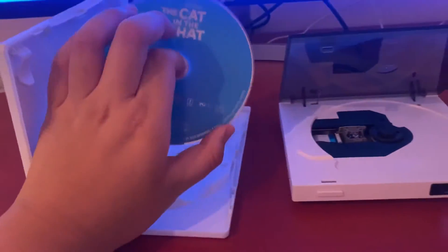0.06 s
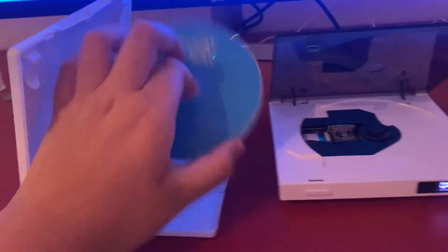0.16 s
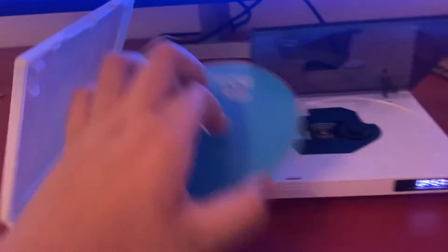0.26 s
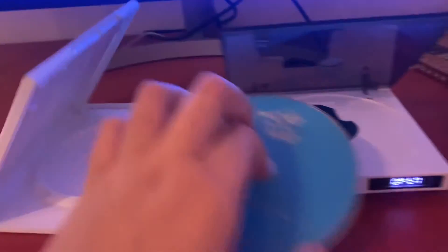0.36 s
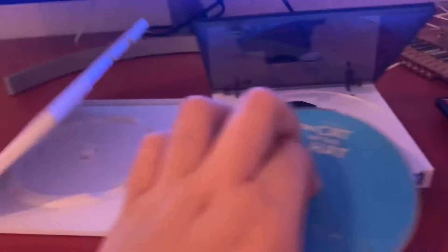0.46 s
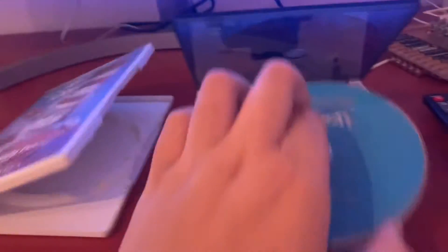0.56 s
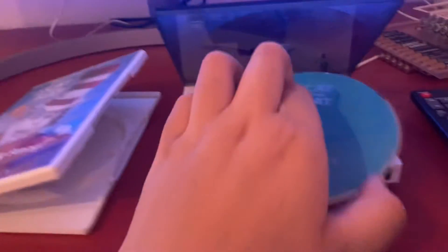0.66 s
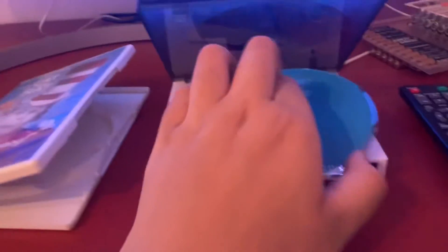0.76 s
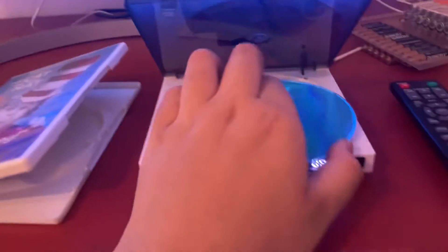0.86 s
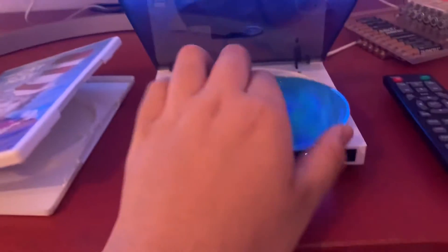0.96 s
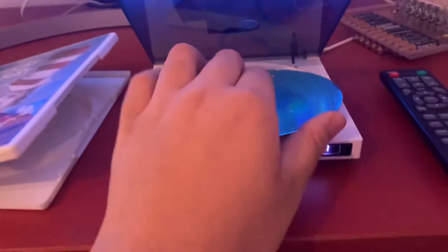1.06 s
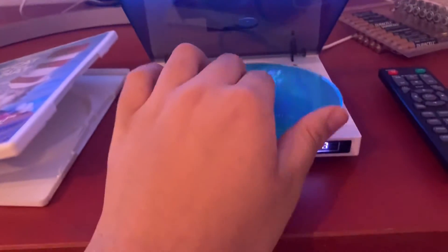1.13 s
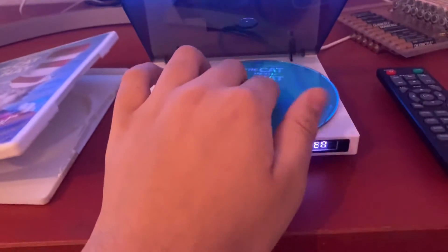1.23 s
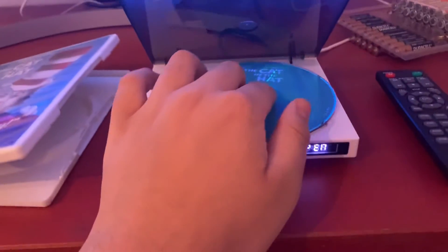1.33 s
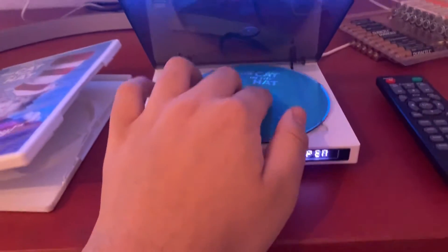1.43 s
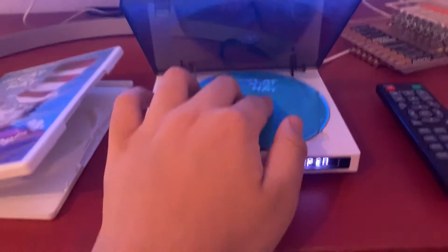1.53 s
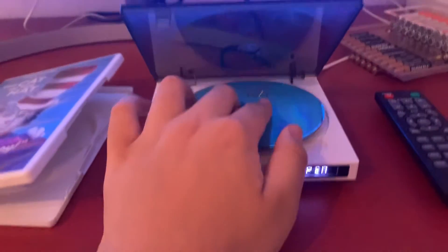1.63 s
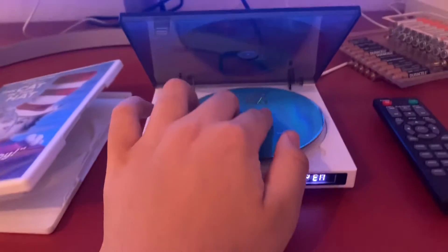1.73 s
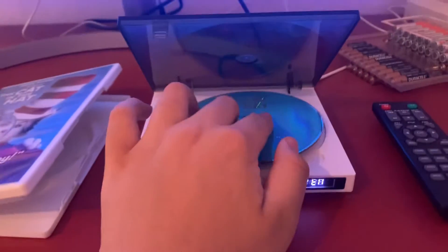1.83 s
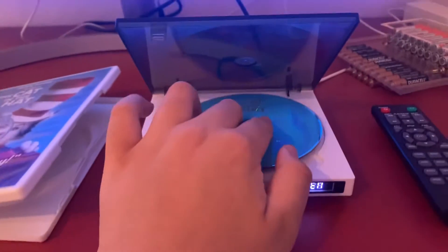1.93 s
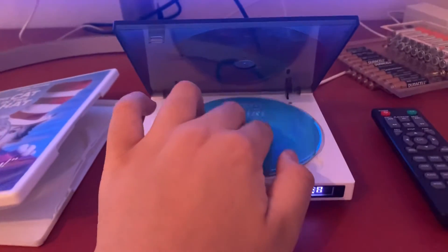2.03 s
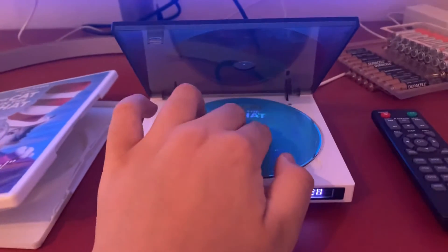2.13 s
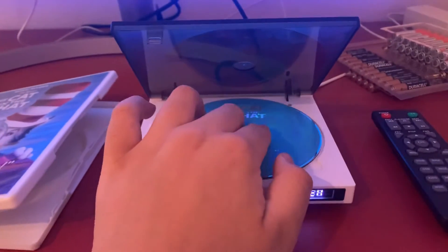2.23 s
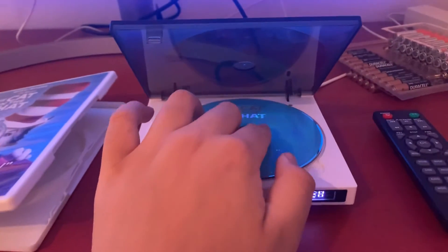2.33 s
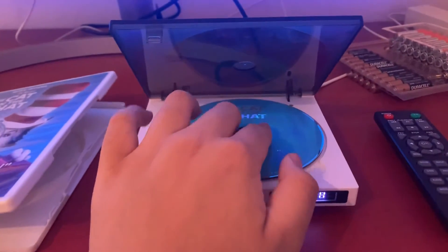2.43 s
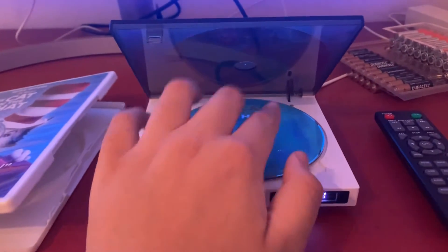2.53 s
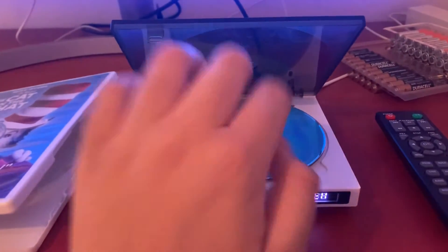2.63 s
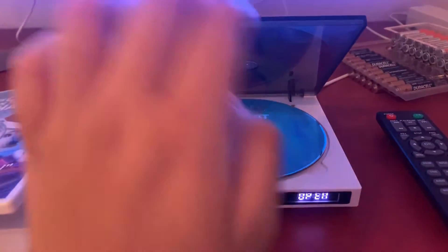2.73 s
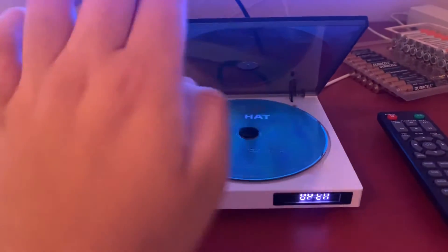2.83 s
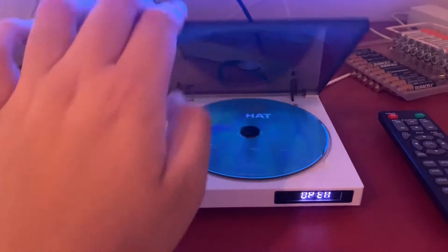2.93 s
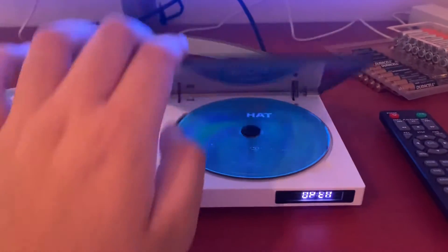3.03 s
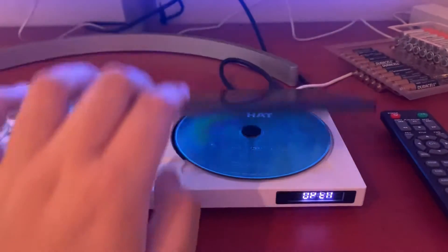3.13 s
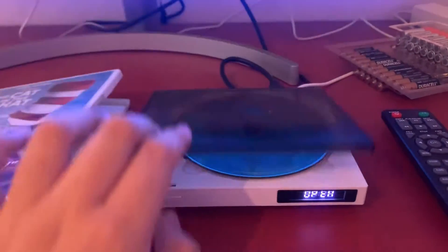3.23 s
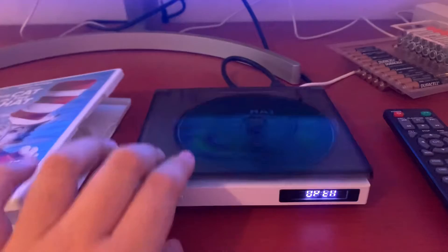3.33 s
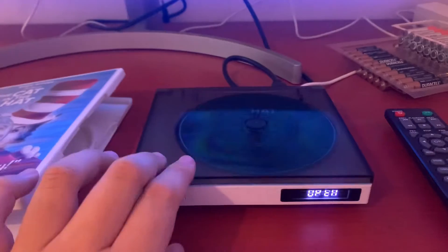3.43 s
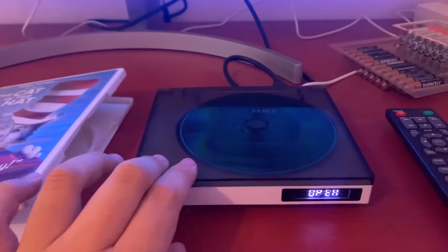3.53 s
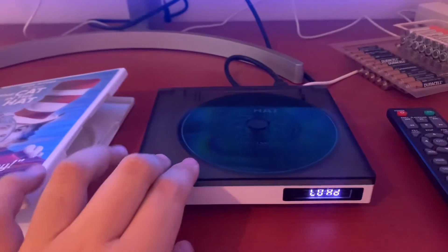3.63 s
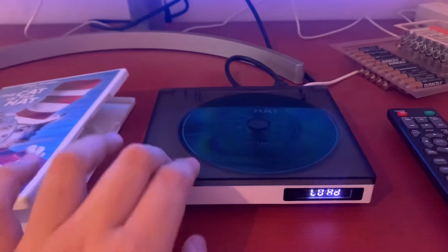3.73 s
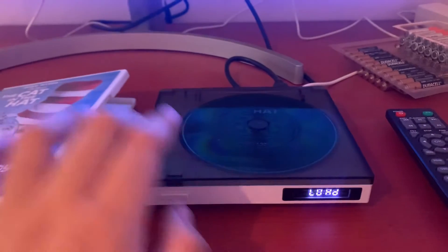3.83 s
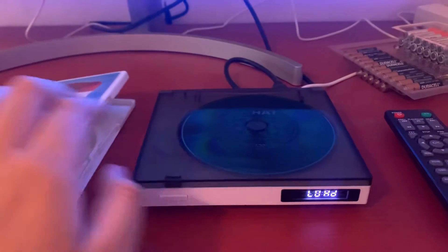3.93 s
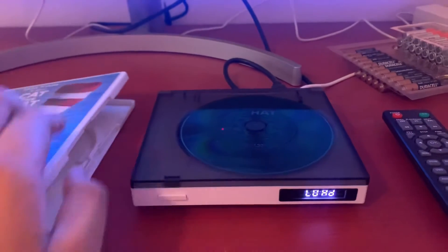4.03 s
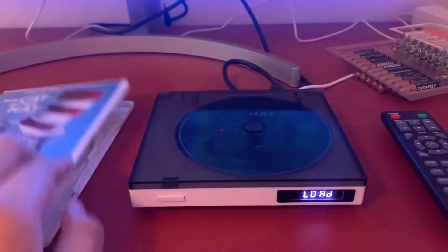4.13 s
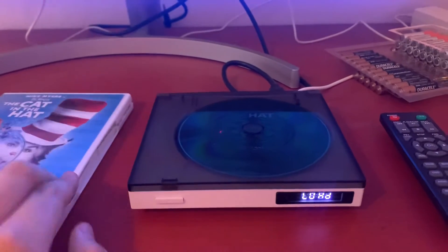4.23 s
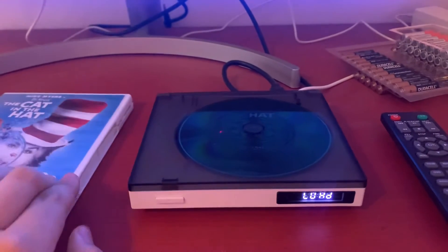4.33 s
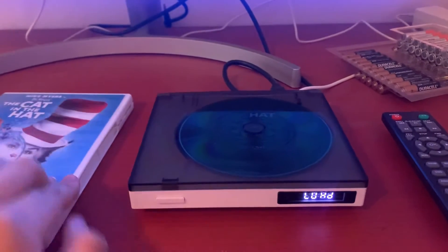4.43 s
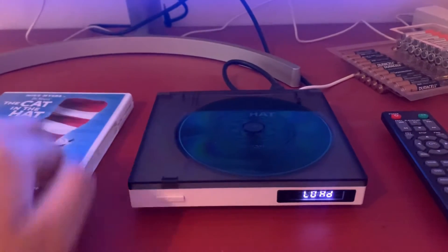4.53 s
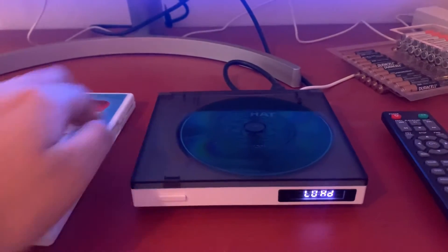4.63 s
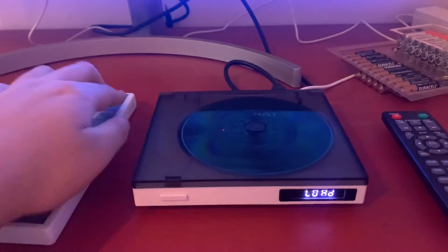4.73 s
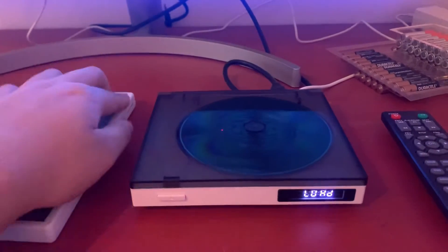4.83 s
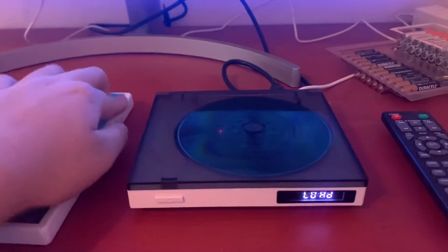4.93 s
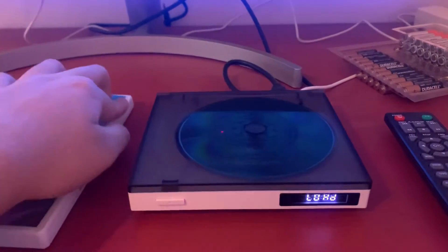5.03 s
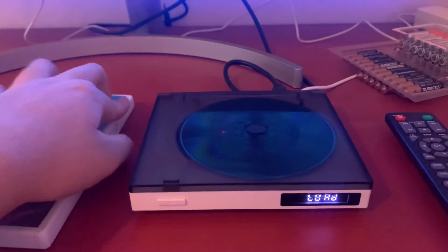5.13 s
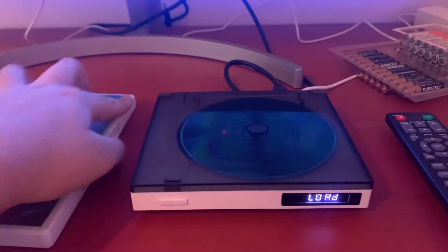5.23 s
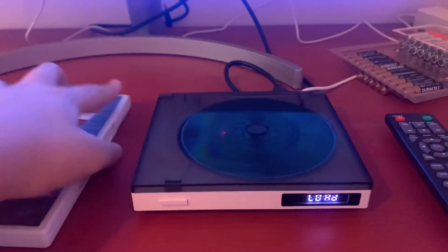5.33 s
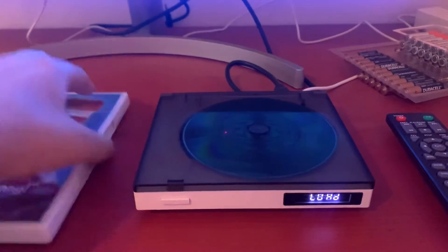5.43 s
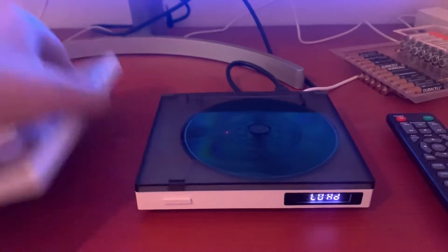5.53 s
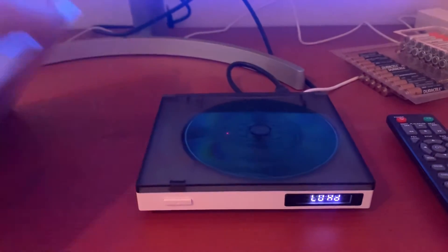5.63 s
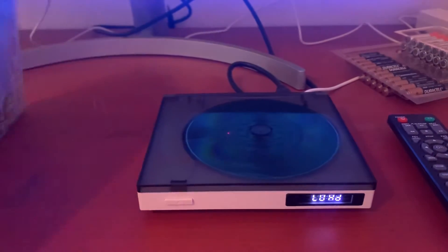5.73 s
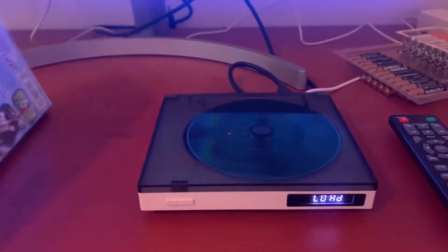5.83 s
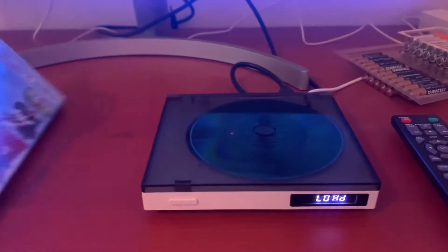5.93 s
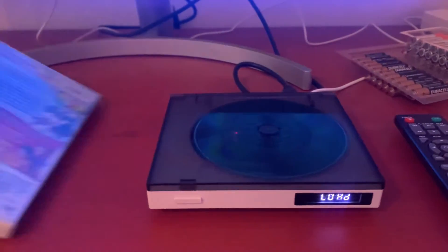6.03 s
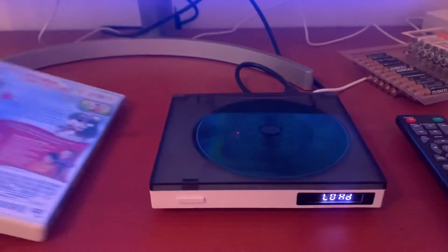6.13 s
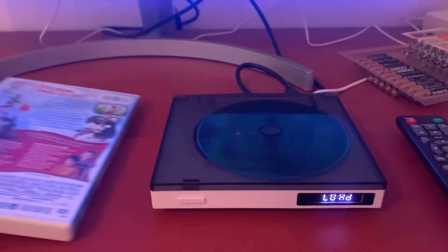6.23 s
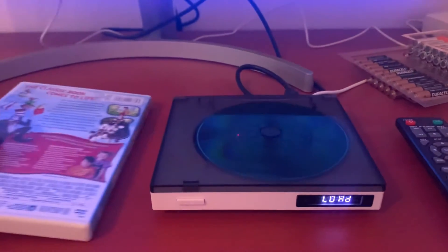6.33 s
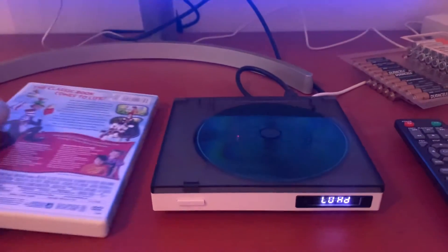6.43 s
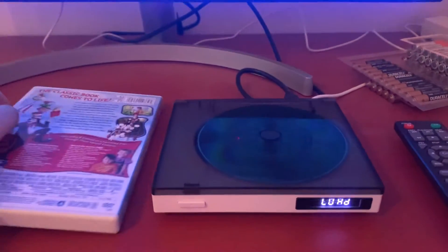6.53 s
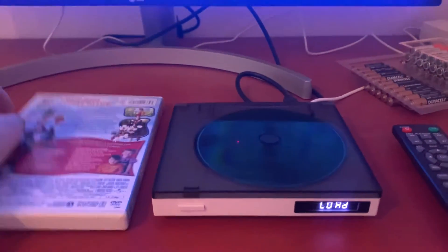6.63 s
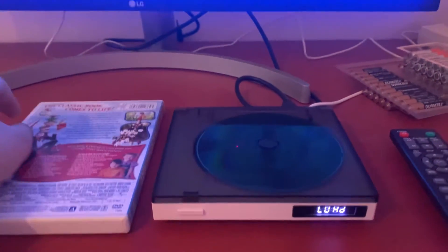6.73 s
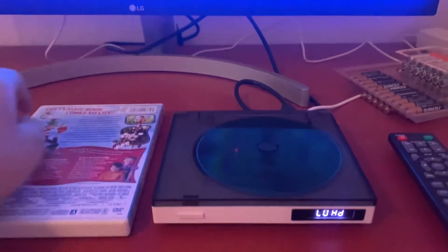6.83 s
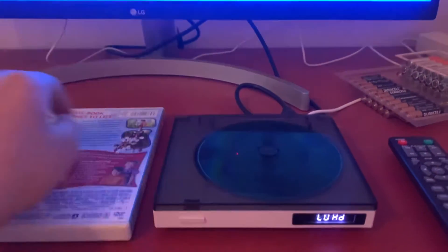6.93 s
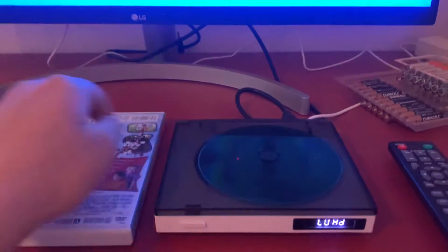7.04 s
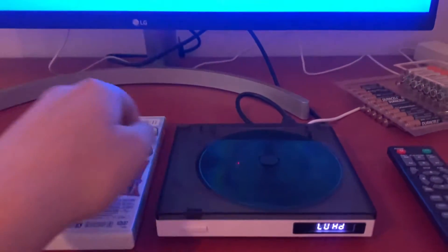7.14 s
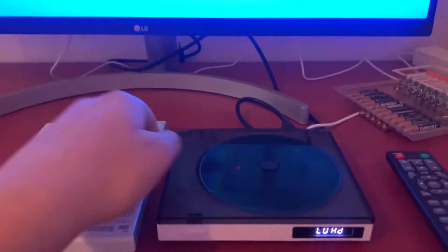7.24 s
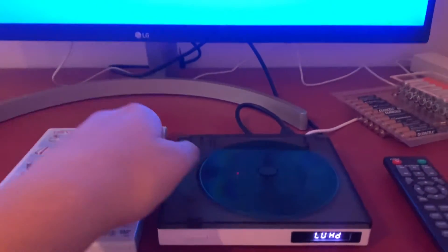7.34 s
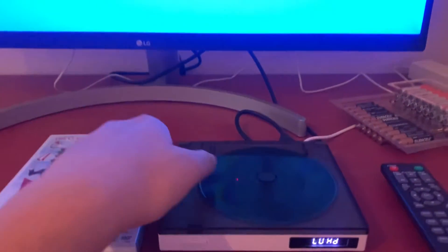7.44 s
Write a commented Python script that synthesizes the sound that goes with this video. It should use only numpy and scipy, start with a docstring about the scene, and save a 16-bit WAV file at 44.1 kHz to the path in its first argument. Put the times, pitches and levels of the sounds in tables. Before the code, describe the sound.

Close hard-plastic clicks: a disc clacks onto a small player, snaps home, lid latches, case snaps shut and knocks the desk over faint drive hum.

```python
"""In a small room, at a desk, a disc is lifted from its plastic case, laid in a small player and pressed onto the hub.
The lid is shut and latches; the case is snapped closed, pressed against the desk and laid down.
Each contact is a few ms of noise ringing resonances, with a low thud; fingers and plastic rub as swelling noise.
The drive is wavering sines and resonant noise; a faint room rush and a steady hiss lie underneath.
Two microphone ports listen from close by."""
import sys
import numpy as np
from scipy import signal
from scipy.fft import rfft, irfft, next_fast_len
from scipy.io import wavfile
from scipy.ndimage import uniform_filter1d, map_coordinates

SR = 44100
rng = np.random.default_rng(int(sys.argv[2]) if len(sys.argv) > 2 else 0)


def wrap_up_sound(samples):
    """Save the sound to the file named by the first command line argument, as 16-bit audio."""
    columns = np.atleast_2d(samples).T
    # keep every value between -1 and 1, then stretch to whole-number steps
    tamed = np.clip(columns, -1, 1)
    steps = np.round(tamed * 32767).astype(np.int16)
    wavfile.write(sys.argv[1], SR, steps)


N = 329427  # length in samples


def amp(db):
    """Decibels to gain."""
    return 10 ** (np.asarray(db) / 20)


def unit(x):
    """Scale to rms 1."""
    return x / np.sqrt(np.mean(x ** 2) + 1e-20)


def blow(x):
    """Scale each channel to the energy of 10 ms at rms 1."""
    return x / np.linalg.norm(x, axis=-1, keepdims=True) * np.sqrt(SR / 100)


def along(points, hz):
    """Read a curve of (Hz, value) points on a log frequency axis."""
    f, v = np.transpose(points)
    return np.interp(np.log(hz + 1), np.log(f + 1), v)


def wobble(rate):
    """A smooth random curve through `rate` random knots a second."""
    knots = rng.standard_normal(int(N * rate / SR) + 4)
    return map_coordinates(knots, [np.arange(N) * rate / SR])


def curves(rows):
    """Smoothed gain per sample for each dB column after the time column; -120 dB outside the rows."""
    s, *columns = np.transpose(rows)
    t = np.arange(N) / SR
    return [uniform_filter1d(amp(np.interp(t, s, db, -120, -120)), size=900) for db in columns]


def held(start, end, ramp_s):
    """1 from start to end, with a linear ramp centred on each edge."""
    t = np.arange(N) / SR
    return np.clip(np.minimum(t - start, end - t) / ramp_s + .5, 0, 1)


def filtered(x, response):
    """Shape x by a complex response of frequency."""
    n = x.shape[-1]
    m = next_fast_len(n + SR // 4)
    return irfft(rfft(x, m) * response(np.fft.rfftfreq(m, 1 / SR)), m)[..., :n]


def resonate(x, body):
    """Ring a body's (Hz, width Hz, dB) resonances in parallel, with alternating signs."""
    def response(f):
        total = 0
        for k, (hz, width, db) in enumerate(body):
            total = total + (-1) ** k * amp(db) * 1j * f * width / (hz * hz - f * f + 1j * f * width)
        return total
    return filtered(x, response)


def noise(colour):
    """Two unrelated noises, rms 1 overall, with a (Hz, dB) spectrum."""
    return unit(filtered(rng.standard_normal((2, N)), lambda hz: amp(along(colour, hz))))


def ringing(body):
    """Two unrelated noises, rms 1 overall, heard through a set of resonances."""
    return unit(resonate(rng.standard_normal((2, N)), body))


def tone(hz):
    """A sine of rms 1 that follows a pitch curve."""
    return np.sqrt(2) * np.sin(2 * np.pi * (np.cumsum(hz) / SR + rng.random()))


def add(track, s, x):
    """Mix x into the track at time s."""
    part = track[:, round(s * SR):][:, :x.shape[1]]
    part += x[:, :part.shape[1]]


# How long the small room rings. Each row: frequency in Hz, mean decay time (T60) in s.
ROOM_DECAY = [(100, 0.053), (400, 0.34), (1000, 0.32), (4000, 0.31), (10000, 0.22), (16000, 0.075)]


def in_room(x, wet_db):
    """Add a fresh tail that builds up as walls answer in uneven clumps; some bands linger, the treble dies sooner."""
    hz, t, z = signal.stft(rng.standard_normal((2, SR // 2)), SR, nperseg=256)
    build_up = 1 - np.exp(-(t / .006) ** 2)
    t60 = along(ROOM_DECAY, hz) * np.exp(.08 * rng.standard_normal(len(hz)))  # scatter from band to band
    clumps_db = 2 * rng.standard_normal(len(t))
    decay = amp(clumps_db - 60 * t / t60[:, None])
    tail = signal.istft(z * build_up * decay, SR, nperseg=256)[1]
    tail = tail / np.linalg.norm(tail[0])
    return x + amp(wet_db) * signal.fftconvolve(x, tail, axes=1)[:, :x.shape[1]]


# Colour of the microphones' own hiss. Each row: frequency in Hz, relative level in dB.
HISS_COLOUR = [(1000, -3.5), (5000, -7.5), (10000, -12), (16000, -10)]


def microphone_hiss():
    """The microphones' own steady hiss, as shaped noise."""
    return amp(-78.5) * noise(HISS_COLOUR)


# Colour of the room's rush. Each row: frequency in Hz, relative level in dB.
ROOM_RUSH = [(18, -36.5), (30, -16.5), (59, 2), (138, -5.5), (174, -19), (239, -6.5), (287, -24.5),
             (473, -11), (684, -20.5), (913, -8), (1040, -21.5), (1430, -18.5), (4910, -46), (10800, -54.5),
             (16000, -44.5)]


def room_air():
    """The room's faint rush, as shaped noise."""
    return amp(-59.5) * noise(ROOM_RUSH)


# Runs of the lens sled. Each row: start in seconds, end in seconds, level in dB.
SLED_RUNS = [(4.636, 4.959, -73.5), (7.188, 7.5, -67)]
# Lines of its gear buzz. Each row: pitch at the start of a run in Hz, relative level in dB.
GEAR_LINES = [(415, -3.5), (800, -3), (1170, -9), (1570, -12), (2070, -6), (2430, -8), (2720, -10.5),
              (2940, -10.5), (4230, -11), (5010, -12.5), (5520, -12)]


def sled():
    """The lens sled's gears buzz as shivering sines that rise a little in pitch along each run."""
    t, out = np.arange(N) / SR, np.zeros(N)
    for start, end, db in SLED_RUNS:
        rise = 1 + .1 * (t - start)  # share of speed gained each second
        speed = rise * (1 + .012 * wobble(250))
        buzz = sum(amp(level) * tone(hz * speed) for hz, level in GEAR_LINES)
        out += amp(db + 3 * wobble(41)) * held(start, end, ramp_s=.04) * buzz
    return out


# The drive spins up, eases off and starts again.
# Each row: time in seconds, then levels in dB for shake, hum, whirr (before a 0.5 dB lift) and whine.
DRIVE_LEVELS = [(3.7, -80.5, -76.5, -100, -110), (4.6, -57, -57, -79.5, -87),
                (5.15, -55.5, -51.5, -62.5, -75), (5.8, -56.5, -53.5, -66.5, -72),
                (6.15, -52, -46.5, -58, -64.5), (6.5, -63, -64.5, -71, -69.5),
                (7.22, -54, -58.5, -63, -70.5), (7.47, -50.5, -55, -59, -75)]
# The disc's speed. Each row: time in seconds, speed as a share of full speed.
DISC_SPEED = [(3.7, .8), (4.6, 0.93), (5.102, 1), (5.601, 1), (5.85, 0.91), (6.101, 1), (6.5, 0.89),
              (6.85, 0.88), (7.47, 0.99)]
# Hum through the desk. Each row: pitch at full speed in Hz, relative level in dB.
HUM_LINES = [(97, -4.5), (138, -16.5), (170, -18.5), (195, -22.5)]
# Whirr in the shell. Each row: resonance in Hz, width in Hz, relative level in dB.
WHIRR_BODY = [(475, 240, 4.5), (910, 42, 2), (1200, 33, -5), (2085, 2500, -13), (2500, 280, -6.5),
              (3570, 510, -5.5), (4260, 800, -8), (4860, 160, -9), (5440, 110, -9), (6800, 320, -20)]
# The spindle's whine. Each row: mean pitch in Hz, relative level in dB.
WHINE_LINES = [(3580, -1), (4480, -16), (5630, -10), (6520, -19)]
SHAKE_HZ = 58  # the disc's imbalance, once a turn at full speed
WANDER_PER_S = 10  # knots a second in the slow wander of hum and whine


def drive():
    """The spinning disc shakes and hums through the desk; the spindle holds a thin whine and whirrs in the shell."""
    shake, hum, whirr, whine = curves(DRIVE_LEVELS)
    speed = np.interp(np.arange(N) / SR, *np.transpose(DISC_SPEED))

    def turning_line(full_speed_hz):
        flutter = amp(3 * wobble(7.5))
        return flutter * tone(full_speed_hz * (speed + .01 * wobble(WANDER_PER_S)))

    low = shake * unit(turning_line(SHAKE_HZ))
    low += hum * unit(sum(amp(db) * turning_line(hz) for hz, db in HUM_LINES))
    shivering = 1 + .016 * wobble(400) + .005 * wobble(WANDER_PER_S)  # fast shiver, slow drift
    thin = sum(amp(db + 3.8 * wobble(30)) * tone(hz * shivering) for hz, db in WHINE_LINES)
    return low + amp(0.5) * whirr * ringing(WHIRR_BODY) + whine * thin + sled()


# The background sinks briefly. Each row: start in seconds, end in seconds, depth in dB.
QUIET_SPELLS = [(0.425, 0.905, 6.5), (1.772, 2.014, 10.5), (2.598, 2.715, 15.5), (2.769, 3.052, 11.5),
                (4.75, 4.798, 22.5), (6.688, 7.146, 10.5)]


def background():
    """The room's rush and the drive sink together in the lulls, over the steady hiss."""
    sink_db = sum(depth_db * held(start, end, ramp_s=.076) for start, end, depth_db in QUIET_SPELLS)
    return amp(-sink_db) * (room_air() + drive()) + microphone_hiss()


def swells(rows):
    """Gain per sample for each dB column of strokes that swell quickly and fade more slowly."""
    t, peak = np.arange(N) / SR, .13  # the peak comes this far into a stroke

    def hump(s, length):
        return np.sin(np.pi / 2 * np.interp(t, [s, s + peak * length, s + length], [0, 1, 0])) ** 2

    return sum(amp(levels_db)[:, None] * hump(s, length) for s, length, *levels_db in rows)


# Fingers and plastic brush past each other.
# Each row: start in seconds, length in seconds, rub level in dB (before a 3 dB cut), hiss level in dB.
BRUSH_STROKES = [(.5, 0.068, -82, -62), (.76, 0.13, -56.5, -63.5), (1.07, 0.2, -33, -65),
                 (1.36, 0.18, -58.5, -78), (1.572, 0.07, -40, -63), (2.05, 0.25, -48, -68.5),
                 (2.9, 0.088, -61.5, -100), (3.07, 0.28, -74.5, -95), (3.69, 0.13, -56, -77),
                 (4.48, 0.15, -61, -71), (4.77, .08, -63, -71), (5.24, 0.78, -61, -80.5),
                 (5.53, 0.27, -49.5, -66), (5.92, 0.25, -49.5, -57.5), (6.1, 0.35, -61.5, -65.5),
                 (6.36, 0.39, -67.5, -74)]
# Colour of the rub. Each row: frequency in Hz, relative level in dB.
RUB_COLOUR = [(290, -30), (500, -10), (708, -7.5), (873, 0), (1390, -10.5), (2180, -12.5), (6640, -25.5),
              (7640, -29), (8000, -60), (10400, -91.5), (17600, -120)]
# Colour of the brushing hiss. Each row: frequency in Hz, relative level in dB.
BRUSH_HISS = [(7000, -35.5), (10000, -1.5), (12000, -1.5), (13500, -7), (15200, 1), (17000, -20.5)]


def brushing():
    """Broad noise made grainy: plastic slides in tiny catches that bunch together."""
    rub, hiss = swells(BRUSH_STROKES)
    grain = unit(amp(1.5 * wobble(160) + 2.2 * wobble(35)))  # fine catches, slower clumps
    return grain * (amp(-3.0) * rub * noise(RUB_COLOUR) + hiss * noise(BRUSH_HISS))


# Slips that sing: the disc on the tray, fingers on plastic, the case on the desk.
# Each row: start in seconds, length in seconds, pitch in Hz, width in Hz, level in dB.
SINGING_SLIPS = [(1.272, 0.22, 3020, 30.3, -58), (1.724, .2, 4700, 450, -76.5),
                 (1.863, 0.23, 3550, 130, -79), (1.88, .13, 2730, 150, -79), (1.953, .08, 1652, 30, -71),
                 (3.048, 0.16, 1890, 598, -79.5), (3.071, .27, 517, 159, -68.5),
                 (3.722, 0.086, 3420, 119, -68), (4.786, 0.29, 2400, 450, -60),
                 (5.536, 0.18, 2343, 600, -59.5), (5.711, 0.062, 2250, 300, -55),
                 (6.515, .04, 289, 110, -58), (6.565, .04, 317, 119.3, -52), (6.59, .04, 480, 140, -65)]


def squeaks():
    """Each slip is a swell of noise in one narrow resonance, with a grainy level."""
    slips = np.zeros((2, N))
    for s, length, hz, width, db in SINGING_SLIPS:
        swell = np.hanning(round(length * SR))
        band = unit(resonate(rng.standard_normal((2, len(swell))), [(hz, width, 0)]))
        add(slips, s, amp(db) * swell * band)
    return unit(amp(2 * wobble(110))) * slips


def rubbing():
    """Brushing and singing slips share the room's answer."""
    return in_room(brushing() + squeaks(), wet_db=-7.5)


# The player or the case is pushed against the desk. Each row: time in seconds, level in dB.
DESK_PUSHES = [(1.91, -68), (4.942, -26)]
# The hollow answer. Each row: resonance in Hz, width in Hz, relative level in dB.
PUSH_BODY = [(240, 61, -2.5), (330, 220, -4), (460, 120, -14.5)]


def bumps():
    """A soft push, a smooth burst of noise through low resonances, gives a hollow knock with no click."""
    out, t = np.zeros((2, N)), np.arange(SR // 2) / SR
    pulse = t / .0075 * np.exp(-(t / .0075) ** 2)
    for s, db in DESK_PUSHES:
        push = rng.standard_normal((2, len(t))) * pulse
        add(out, s, in_room(amp(db) * blow(resonate(push, PUSH_BODY)), wet_db=-7.5))
    return out


def thud(t, low_modes, rise_s=0.0042):
    """A heavy thing swings up slowly under a blow and rings in decaying low sines."""
    ring = np.zeros(len(t))
    for hz, db, t60 in low_modes:
        decay = amp(db + rng.normal(0, 0.45) - 60 * t / t60)
        ring += decay * np.sin(2 * np.pi * (hz * t + rng.random()))
    return blow(ring * (1 - np.exp(-(t / rise_s) ** 2)))


# The player is leaned on. Each row: time in seconds, level in dB.
LEANS = [(0.937, -30.5), (3.36, -37)]
# It rocks on its feet. Each row: mode in Hz, relative level in dB, T60 in seconds.
LEAN_MODES = [(137, 2.5, 0.19), (146, -4, 0.55)]


def rocking():
    """A lean on the player swells into a low thump with no click."""
    out, t = np.zeros((2, N)), np.arange(SR // 2) / SR
    for s, db in LEANS:
        add(out, s, amp(db) * np.tile(thud(t, LEAN_MODES, rise_s=.016), (2, 1)))
    return out


def chatter(t, length_s):
    """A few ms of edges rattling against each other, with a partly evened-out spectrum."""
    burst = (1 - np.exp(-t / 0.0016)) * np.exp(-(t / length_s) ** 2)
    z = rfft(rng.standard_normal((2, len(t))) * burst)
    even = irfft(z / (np.abs(z) + 1e-9) ** .55, len(t))  # exponent 1 would be fully flat
    return even * np.exp(-(t / (2 * length_s)) ** 4)


# Parts of a blow: hollow, knock, crack, snap, tick. Each row: lower edge in Hz, upper edge in Hz.
BLOW_PARTS = [(220, 600), (600, 1400), (1400, 3200), (3200, 7500), (7500, 15200)]


def balanced(x, levels_db):
    """Bring each part of a blow, from hollow to tick, towards its level and thin out the bass."""
    z, hz = rfft(x), np.fft.rfftfreq(x.shape[1], 1 / SR)
    points = []
    for (lo, hi), db in zip(BLOW_PARTS, levels_db):
        power = np.sum(np.abs(z[:, (hz > lo) & (hz < hi)]) ** 2)
        energy = 2 * power / x.size / (SR / 100)  # against 10 ms at rms 1
        gain_db = db - 10 * np.log10(energy)
        points += [(lo * 1.1, gain_db), (hi / 1.1, gain_db)]
    low_cut = hz ** 4 / (hz ** 4 + 190. ** 4)
    return irfft(z * amp(along(points, hz)) * low_cut, x.shape[1])


def contacts(rows, body, low_modes, parts_db, wet_db, raw_db, spot_db=3.0):
    """Each contact is chatter that rings the plastic, tilted by its brightness, plus a tick and a low thud."""
    out, t = np.zeros((2, N)), np.arange(SR // 2) / SR
    # brightness tilts hollow, knock, crack and snap about 2 kHz
    octaves = np.log2(np.array(BLOW_PARTS[:-1]) / 2000).mean(axis=1)
    for s, strength_db, brightness, tick_db, thud_db, length in rows:
        rattle = chatter(t, length)
        # every spot that is struck favours other resonances
        spot = [(hz, width, db + spot_db * rng.normal()) for hz, width, db in body]
        shell = blow(resonate(rattle, spot)) + amp(raw_db) * blow(rattle)
        levels_db = [*(strength_db + brightness * octaves + parts_db), tick_db]
        click = balanced(shell, levels_db) * (t < .4)
        add(out, s, in_room(click, wet_db) + amp(thud_db) * thud(t, low_modes))
    return out


# Low modes of the desk. Each row: mode in Hz, relative level in dB, T60 in seconds.
DESK_MODES = [(62.6, -11.5, 0.26), (91.5, -7.5, 0.11), (133, 0, 0.085), (139.3, 1.5, 0.16), (186, -8, 0.11),
              (212, -11, 0.069)]
# The rosette lets go. Each row: start in seconds, strength in dB, brightness in dB per octave,
# tick in dB, thud in dB, length in seconds.
RELEASE_HITS = [(.2045, -50, -1, -48.5, -57, 0.0051)]
# The rosette's ring. Each row: resonance in Hz, width in Hz, relative level in dB.
ROSETTE_BODY = [(654, 34, 1), (786, 130, -3), (967, 107, 0.5), (1740, 82, -3), (8600, 1000, -28),
                (14300, 1200, -19)]


def release():
    """The case's rosette lets go of the disc with a small knocking click."""
    return contacts(RELEASE_HITS, ROSETTE_BODY, DESK_MODES, parts_db=[-12.0, 10.5, -0.5, -13],
                    wet_db=-12.5, raw_db=-35)


# The cover's taps. Each row: start in seconds, strength in dB, brightness in dB per octave,
# tick in dB, thud in dB, length in seconds.
FLAP_HITS = [(.508, -51, 1.9, -45, -77, 0.004), (.522, -59, 0.8, -60, -85, 0.0022),
             (.565, -57, 2.5, -53, -81, 0.0019), (.669, -57, 0, -54.5, -63, 0.004),
             (.688, -64.5, -0.18, -63, -71, 0.0033), (.766, -50.5, -1, -49.5, -84, 0.004),
             (.786, -56.5, -2, -68, -76, .003), (.817, -52, -2.15, -59, -72, .003),
             (.826, -51.5, -0.82, -53, -64.5, 0.0023), (.846, -58.5, -1, -61, -78, .003)]
# The cover's ring. Each row: resonance in Hz, width in Hz, relative level in dB.
COVER_RING = [(486, 50, -3.5), (908, 100, -1.5), (1160, 170, -2), (1555, 220, 4), (2080, 410, -1),
              (2920, 660, -5), (4300, 650, -7), (6300, 1600, -10.5), (11160, 3400, -9.5), (14500, 1500, -3)]


def flap():
    """The case's cover swings to and fro in light taps that ring its sheet."""
    return contacts(FLAP_HITS, COVER_RING, DESK_MODES, parts_db=[-12.5, -3.5, 1.5, -1.5],
                    wet_db=-4.0, raw_db=-15.0, spot_db=3.5)


# The disc's landing. Each row: start in seconds, strength in dB, brightness in dB per octave,
# tick in dB, thud in dB, length in seconds.
TRAY_HITS = [(.927, -38.5, -3.5, -59, -49, 0.0044), (.939, -44.5, -1, -52.5, -50, 0.0048),
             (.951, -48.5, -0.5, -60.5, -51.5, 0.0037), (.972, -52, -1, -60, -58, .005),
             (1.001, -48, 3, -53, -56.5, 0.014), (1.096, -20, 4, -16, -35.5, 0.0074),
             (1.139, -38, -0.5, -45, -41.5, 0.019), (1.157, -36.5, -3.96, -35.5, -51, 0.0014),
             (1.18, -35, 5, -26.5, -34, 0.009), (1.207, -38, -1.5, -58.5, -54, 0.0035),
             (1.426, -67, 3, -68, -70.5, 0.0062), (1.462, -57.5, -2, -86, -63, 0.0083),
             (1.522, -62.5, -5.5, -60.5, -53, 0.0023), (1.576, -64, -6, -55, -68, .0015),
             (1.581, -44, 0.5, -41.5, -50.5, 0.0027), (1.587, -45.5, 1, -49, -58, 0.0025),
             (1.595, -44.5, 2.5, -49.5, -52.5, 0.0028), (1.603, -38, -1, -66, -57, 0.0017),
             (1.61, -50.5, -5.5, -64, -57.5, 0.0073), (1.62, -69, 5, -69, -51, 0.0016),
             (1.648, -50, -4.5, -47.5, -78, 0.0035), (1.655, -55.5, 5.5, -64.5, -73, .002),
             (1.673, -44.5, 0.5, -41.5, -49, 0.0062), (1.689, -60, 1, -69, -63.5, 0.002),
             (2.432, -70.5, 8, -63, -62.5, 0.0049), (2.453, -64, -2, -64.5, -57, 0.0058)]
# The tray's ring. Each row: resonance in Hz, width in Hz, relative level in dB.
TRAY_RING = [(849.7, 17, 4), (1067, 24, -6.5), (1247, 31, 0), (1600, 350, 1), (1950, 180, -1),
             (2580, 110, 1), (3360, 310, -0.5), (3620, 370, -2), (4480, 260, 1), (5850, 140, -5),
             (6600, 880, -8), (10816, 1900, -5.5), (14400, 2500, -9)]
# The player rocking on its feet. Each row: mode in Hz, relative level in dB, T60 in seconds.
FEET_MODES = [(80.4, -9, 0.35), (137, -2, 0.28), (152.8, -10.5, 0.57)]


def tray():
    """The disc lands on the player and rattles into place, ringing the tray and rocking the feet."""
    return contacts(TRAY_HITS, TRAY_RING, FEET_MODES, parts_db=[-23.5, 2, -1.0, -5.5],
                    wet_db=-11.5, raw_db=-11, spot_db=2.5)


# The snap onto the hub. Each row: start in seconds, strength in dB, brightness in dB per octave,
# tick in dB, thud in dB, length in seconds.
HUB_HITS = [(2.017, -47, 0.44, -22.5, -33.5, 0.0053)]
# The disc's ring. Each row: resonance in Hz, width in Hz, relative level in dB.
DISC_RING = [(590, 38, 13.5), (670, 140, 3), (820, 110, 1), (920, 60, -6), (1300, 170, -23),
             (1610, 87, 2.5), (3430, 370, -6), (4170, 240, -3), (8900, 1200, 1.5), (14500, 3100, 5)]
# The player's feet and the bending of the clamped disc.
# Each row: mode in Hz, relative level in dB, T60 in seconds.
FLEX_MODES = [(93.7, -2, 1), (140, 1.5, 0.85), (542, 6.5, 0.41), (618, 6.5, 0.74), (697, -7, .25),
              (884, 5, 0.45), (62.15, -2.5, 1)]


def hub():
    """The disc snaps onto the hub, ringing and bending as it is clamped."""
    return contacts(HUB_HITS, DISC_RING, FLEX_MODES, parts_db=[9.7, 13.5, 0.93, 2.3], wet_db=-5.5, raw_db=-16.0)


# The whole player under its lid. Each row: mode in Hz, relative level in dB, T60 in seconds.
CHASSIS_MODES = [(63.5, -5.5, 0.27), (94, 0.5, 0.22), (139, -3, 0.1), (146.2, 1, 0.22), (189, -12.5, 0.23),
                 (249, -13, 0.21)]
# The lid is tipped and meets the latch. Each row: start in seconds, strength in dB,
# brightness in dB per octave, tick in dB, thud in dB, length in seconds.
HINGE_HITS = [(2.907, -66.5, -7.5, -69, -58.5, 0.0052), (3.28, -67, -5.5, -79, -73.5, 0.005),
              (3.351, -50, 0.5, -51.5, -51.5, 0.0078)]
# The hinge's ring. Each row: resonance in Hz, width in Hz, relative level in dB.
HINGE_RING = [(940, 110, 1), (1400, 200, -3.5), (1854, 60, 6.5), (2370, 400, -9), (2974, 400, -5.5),
              (3930, 300, 0.5), (6500, 2300, -13), (11230, 2500, -11), (14700, 1500, -8)]


def hinge():
    """The lid is tipped on its hinge and comes to rest on the latch in faint clicks."""
    return contacts(HINGE_HITS, HINGE_RING, CHASSIS_MODES, parts_db=[-7, 0.5, 1, -0.5], wet_db=-10, raw_db=-14)


# The lid latches and settles. Each row: start in seconds, strength in dB, brightness in dB per octave,
# tick in dB, thud in dB, length in seconds.
LID_HITS = [(3.479, -32, 5.5, -20.5, -47, 0.0029), (3.487, -23.5, 1, -21.5, -35, 0.0098),
            (3.503, -33.5, -2, -37.5, -23.5, 0.0058), (3.516, -44, -4.5, -46, -34.5, 0.0058),
            (3.529, -46, -2.5, -38, -31.5, 0.0055), (3.598, -73, 8, -52.5, -43.5, 0.0078),
            (3.722, -60.5, -0.5, -76.5, -47.5, 0.022), (3.752, -66, -2, -72, -43.5, 0.013)]
# The lid's ring. Each row: resonance in Hz, width in Hz, relative level in dB.
LID_RING = [(420, 75, -3), (479, 37, 7), (610, 53, 2), (934, 70, 3.5), (1400, 500, -7), (1950, 160, -4),
            (2392, 190, -3.5), (2858, 200, -6.5), (3145, 240, -5), (3910, 250, -4.5), (4290, 290, -4.5),
            (5610, 900, -11.5), (5930, 254.5, -6), (7240, 270, -2.5), (7350, 190, -12), (12100, 2600, -3.5),
            (15060, 2400, -12)]


def lid():
    """The lid is pressed home, latches and settles over the low ring of the whole player."""
    return contacts(LID_HITS, LID_RING, CHASSIS_MODES, parts_db=[0.51, -0.32, 0.61, -0.32],
                    wet_db=-13.0, raw_db=-15.5)


# The case closes. Each row: start in seconds, strength in dB, brightness in dB per octave,
# tick in dB, thud in dB, length in seconds.
CATCH_HITS = [(4.161, -49.5, 0.5, -62, -61.5, 0.0073), (4.335, -20.5, 2, -20.5, -39, 0.0049),
              (4.353, -30.5, 0, -52, -39.5, 0.0071), (4.361, -36.5, -0.5, -41, -32, 0.01),
              (4.527, -55.5, -5.5, -88, -52.5, 0.0042)]
# The closing case's ring. Each row: resonance in Hz, width in Hz, relative level in dB.
CATCH_RING = [(392, 41, -8.5), (622, 36, -5), (806, 27, 1), (892, 110, 7.5), (1072, 18, -3),
              (1233, 5.4, -2), (1698, 140, 1.5), (2240, 46, 6), (2230, 170, 4.5), (3100, 800, 0),
              (3947, 220, -4.5), (4240, 22, 4), (4400, 270, -5.5), (4970, 130, -1), (6050, 600, -12.5),
              (6926, 300, -2.5), (7620, 690, -8), (10310, 2700, -1.5), (14500, 820, -17.5)]


def catch():
    """The case is closed and its front catch snaps, ringing the shell."""
    return contacts(CATCH_HITS, CATCH_RING, DESK_MODES, parts_db=[-7.0, 1, 1, -5.5],
                    wet_db=-8.0, raw_db=-8, spot_db=.5)


# The case on the desk. Each row: start in seconds, strength in dB, brightness in dB per octave,
# tick in dB, thud in dB, length in seconds.
CASE_HITS = [(4.940, -21.5, 6.5, -27.5, -36, 0.0048), (4.947, -35.5, -3, -40, -23.5, 0.0079),
             (4.958, -34, 1, -36.5, -30, 0.015), (5.157, -61, -1.5, -54.5, -58, 0.004),
             (5.923, -40.5, -2, -49, -42, 0.005), (5.945, -50, -5, -53.5, -31, 0.013),
             (6.639, -51, 1, -55.5, -54, 0.0037)]
# The shut case's ring. Each row: resonance in Hz, width in Hz, relative level in dB.
CASE_RING = [(240, 18, -7), (375.6, 59, -0.5), (474.7, 97, 2), (609.3, 69, 1), (854, 36, 4), (939, 200, -5),
             (1623, 210, 3), (1960, 180, 2), (2366, 260, 4), (3035, 400, -3.5), (3520, 60, -2.5),
             (3840, 630, -3.5), (4135, 50, -3.5), (4435, 270, -8), (5040, 230, -8), (5640, 780, -15.5),
             (6200, 220, -11.5), (6500, 400, -9.5), (7880, 460, -2.5), (10900, 3300, -2),
             (15000, 1300, -23)]


def case():
    """The case is pressed shut against the desk, then laid down, ringing shell and desk."""
    return contacts(CASE_HITS, CASE_RING, DESK_MODES, parts_db=[0.0, 5.5, 0.5, -6.0],
                    wet_db=-10.0, raw_db=-9.5, spot_db=1.0)


def scene():
    """The background, the rubbing and soft pushes, then every plastic thing's contacts."""
    soft = background() + rubbing() + bumps() + rocking()
    disc = release() + flap() + tray() + hub()
    closing = hinge() + lid() + catch() + case()
    return soft + disc + closing


# How alike the ports hear. Each row: frequency in Hz, left-right likeness (1 is identical).
LIKENESS = [(100, 0.98), (450, 0.35), (1000, 0.037), (1500, 0.12), (5000, 0.23), (7000, 0.43), (8500, 1),
            (16000, 0.84)]
# Phase between the ports. Each row: frequency in Hz, lead of the left in radians.
LEFT_LEAD = [(80, 0), (200, 1), (340, 4.3), (430, 5.6), (550, 8.6), (800, 12.2), (1000, 13.5), (1300, 14.3),
             (2000, 17.3), (2500, 16.5), (3200, 13.8), (4000, 13.2), (4500, 15), (5300, 15.3), (6000, 12.9),
             (8000, 9.7), (9000, 8.8), (10000, 6.8), (12000, 5.1), (13500, 3.2), (15200, .4)]
# Level between the ports. Each row: frequency in Hz, left minus right in dB.
LEFT_BALANCE = [(700, -1), (1200, 0.5), (2500, -0.5), (3800, -2.5), (5000, -5.5), (6200, -3.5), (7200, 0)]


def record(dry):
    """Two ports hear alike in bass and top treble, with a phase shift between them; peaks are rounded off."""
    def blend(hz):
        turn = np.arccos(np.clip(along(LIKENESS, hz), -1, 1)) / 2
        return np.array([np.cos(turn), np.sin(turn)])

    def tilt(hz):
        left = amp(along(LEFT_BALANCE, hz) / 2) * np.exp(.5j * along(LEFT_LEAD, hz))
        return np.array([left, 1 / left])

    def passband(hz):
        # from about 32 Hz to a steep edge at 16.2 kHz
        return hz ** 6 / (hz ** 6 + 32. ** 6) / (1 + (hz / 16200) ** 110)

    shared, apart = filtered(dry, blend)
    ports = filtered(np.array([shared + apart, shared - apart]), tilt)
    rounded = ports / (1 + np.abs(ports / .9) ** 6) ** (1 / 6)
    return filtered(rounded, passband)


dry = scene()
out = record(dry)
wrap_up_sound(out)
```